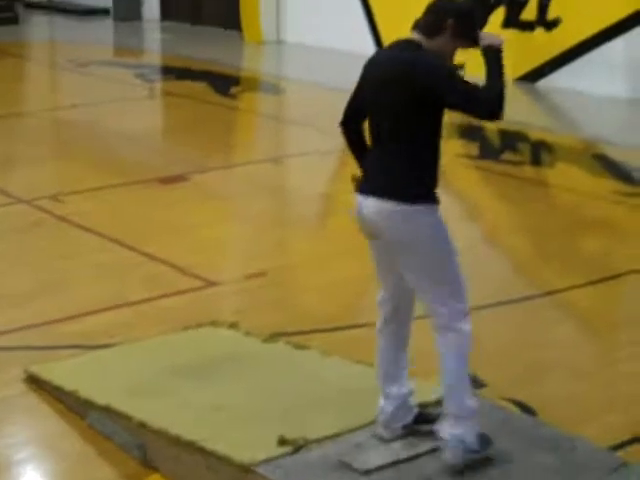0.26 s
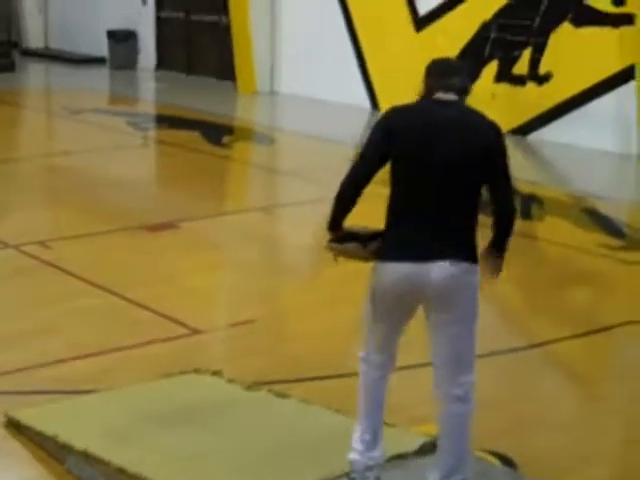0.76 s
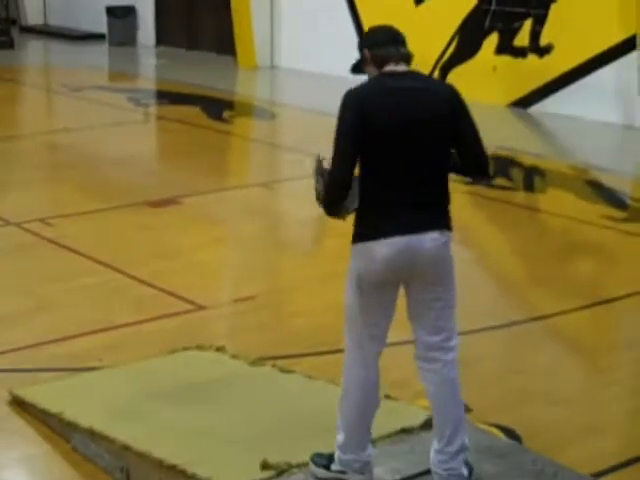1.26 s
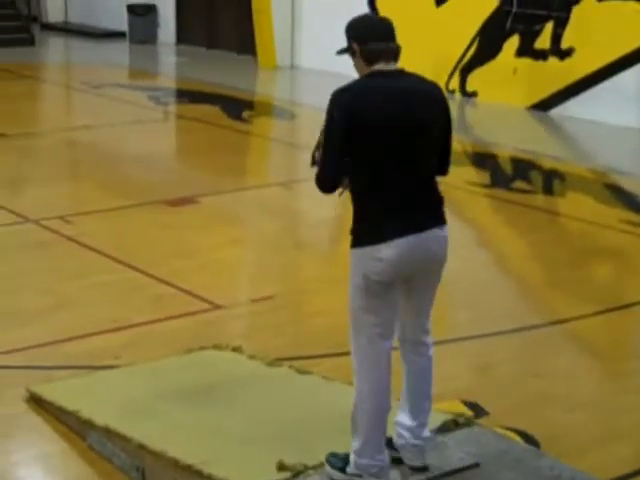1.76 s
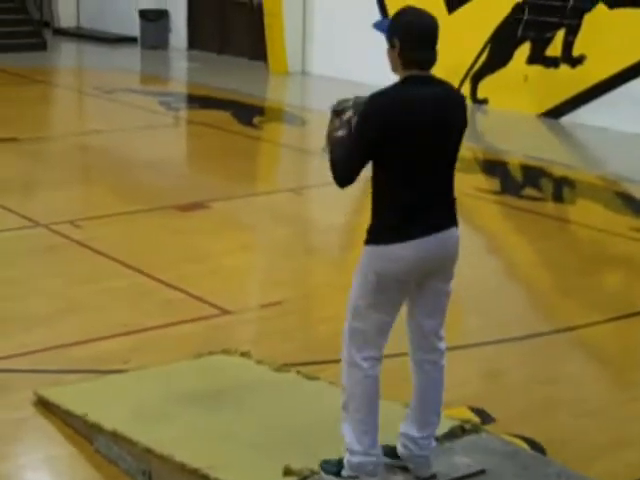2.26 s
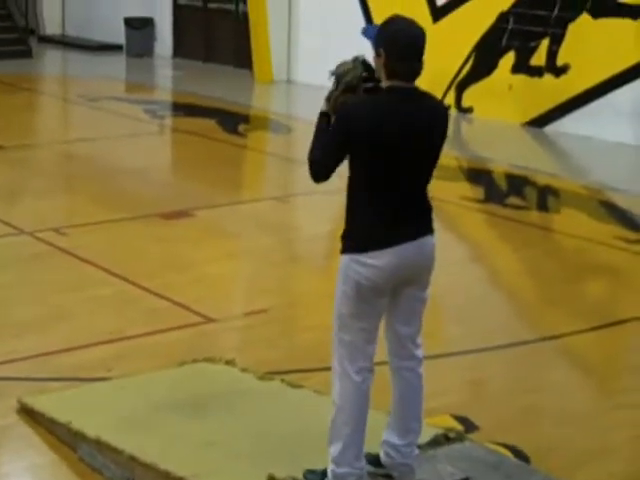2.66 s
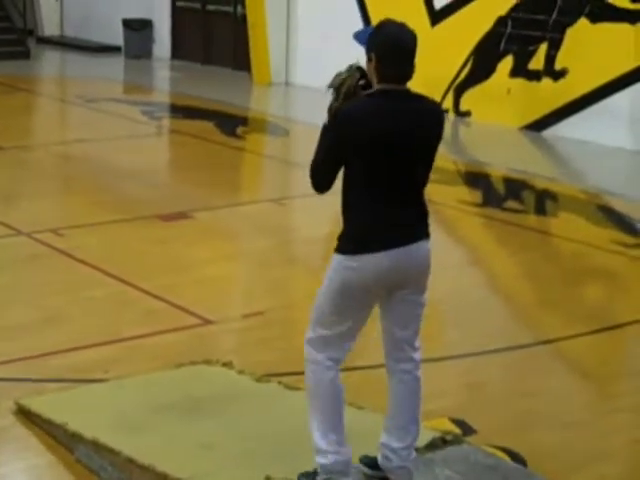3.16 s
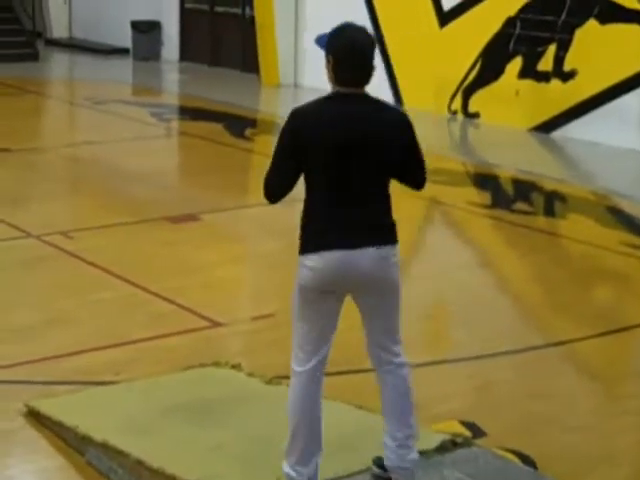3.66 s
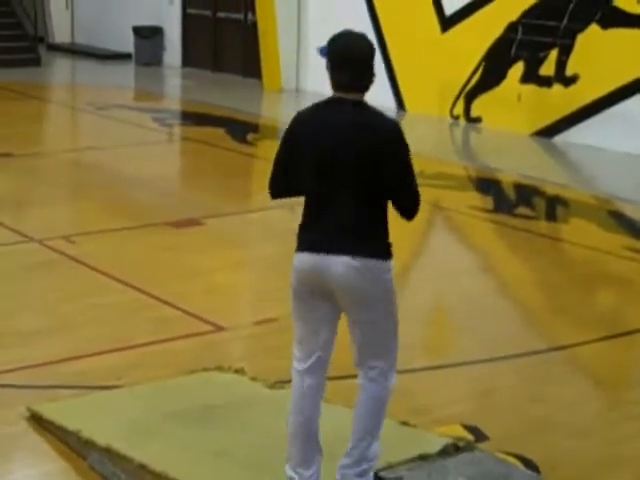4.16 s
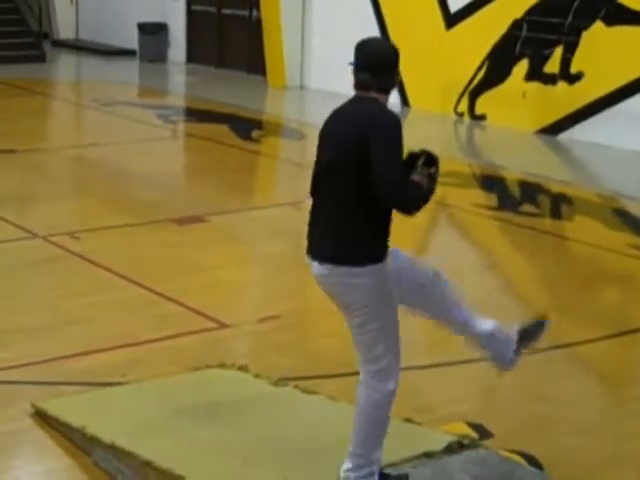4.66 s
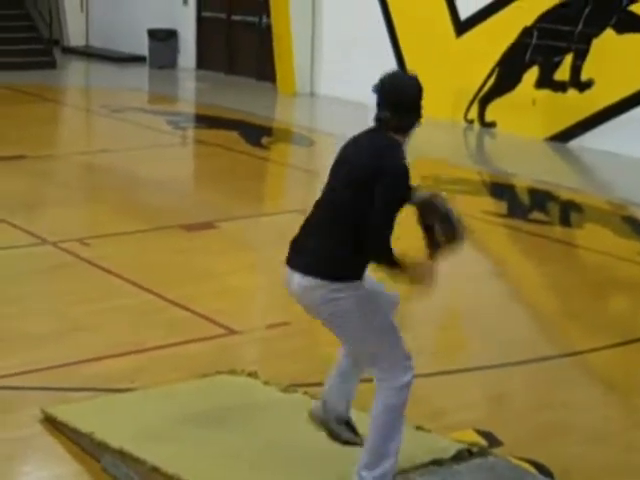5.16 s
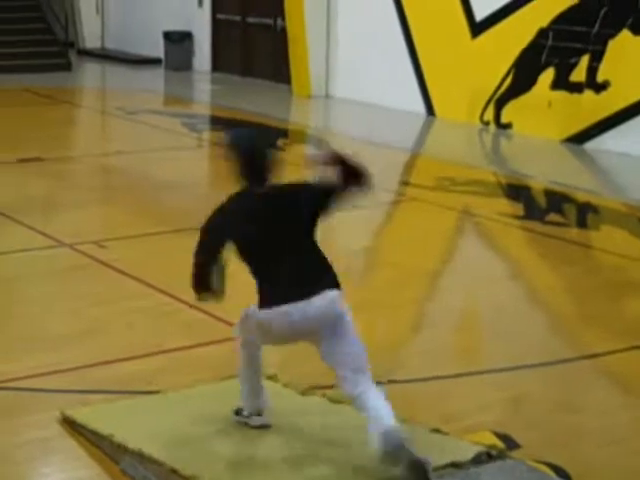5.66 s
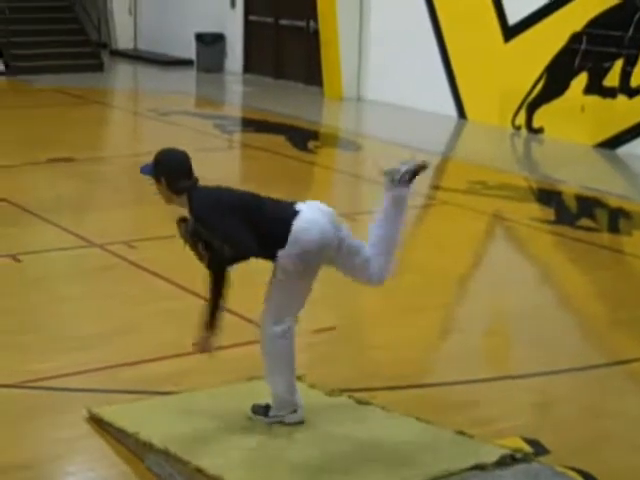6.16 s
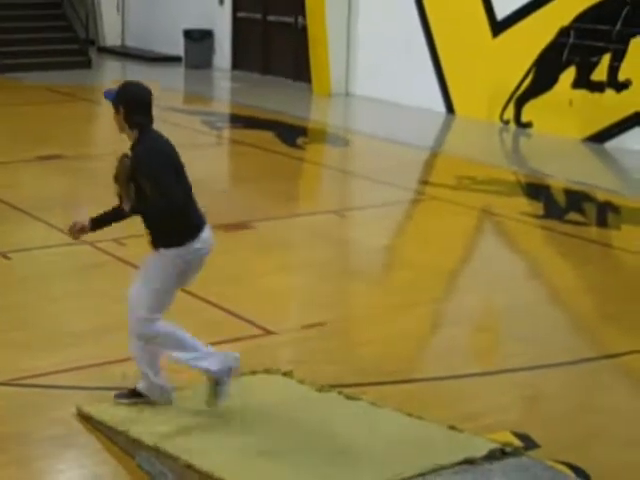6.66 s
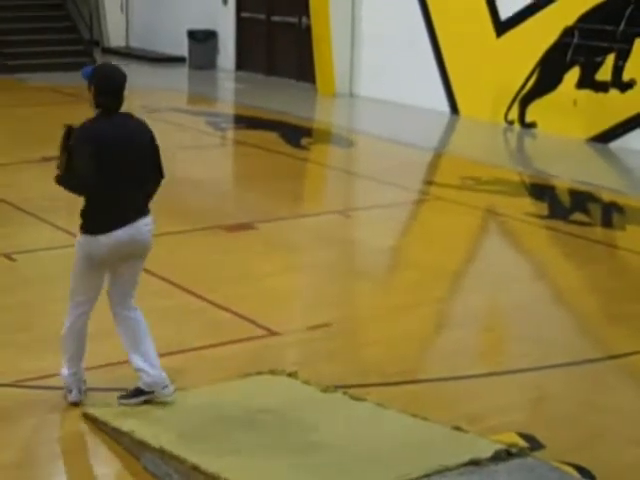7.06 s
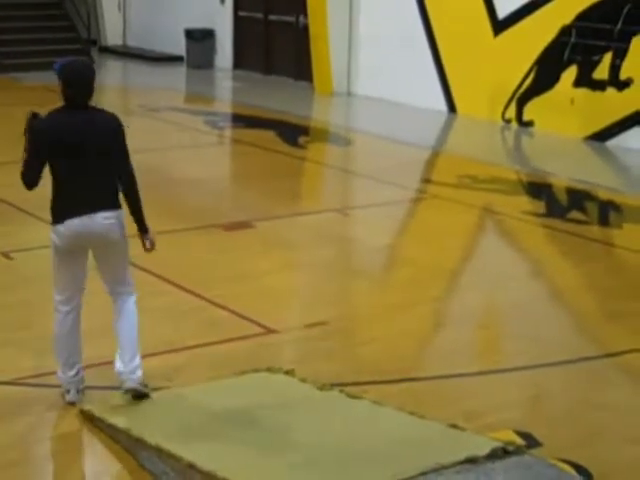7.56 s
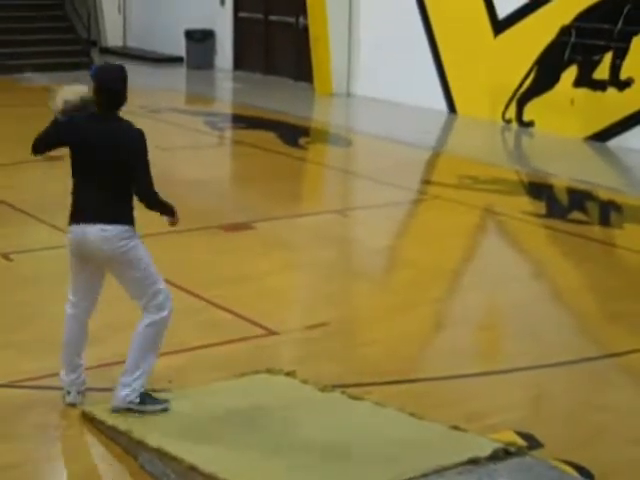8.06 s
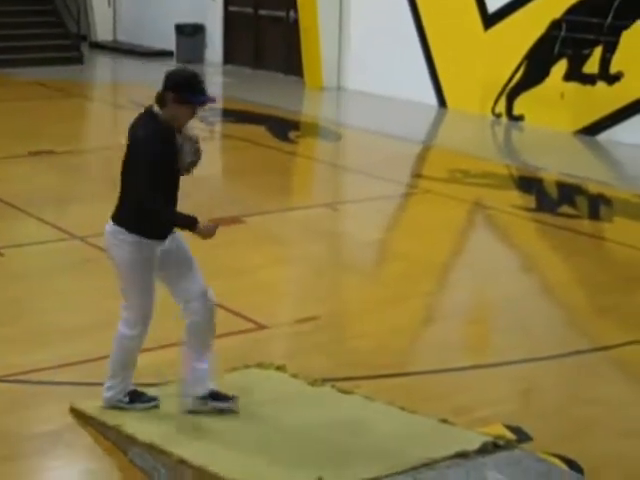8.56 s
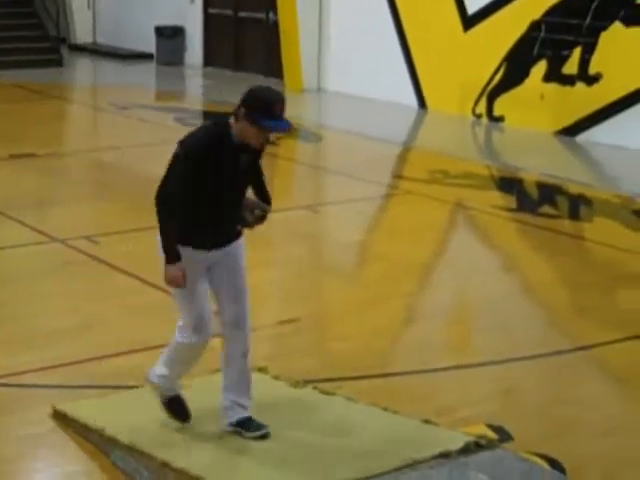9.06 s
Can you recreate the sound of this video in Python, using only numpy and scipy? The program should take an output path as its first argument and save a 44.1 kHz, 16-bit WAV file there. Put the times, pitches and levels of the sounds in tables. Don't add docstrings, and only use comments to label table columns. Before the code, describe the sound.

Fading echo of an earlier blow opens over electrical hum and airy room hush. Feet scuff and tick lightly on boxy boards; a multi-part landing thud booms, with a brief carpet scrape. A hard leather crack with a deep pocket boom fills the big hall, briefly ducking the sound captured by a small camera microphone. Footfalls, a modest glove slap and leather rustles follow.

```python
import sys
import numpy as np
from scipy import signal
from scipy.io import wavfile
from scipy.ndimage import uniform_filter1d

SR = 44100
rng = np.random.default_rng(int(sys.argv[2]) if len(sys.argv) > 2 else 0)


def level_to_linear(level):
    exponent = np.asarray(level, float) / 20
    return 10 ** exponent


def store_wav(level_fs):
    pcm = np.round(np.clip(np.atleast_2d(level_fs), -1, 1) * 32767)
    wavfile.write(sys.argv[1], SR, pcm.T.astype(np.int16))


N = 410571


def rms_one(x):
    return x / np.sqrt(np.mean(x ** 2) + 1e-20)


def at_hz(points, hz):
    points_hz, values = np.transpose(points)
    return np.interp(np.log(hz), np.log(points_hz), values)


def in_time(rows):
    return np.interp(np.arange(N) / SR, *np.transpose(rows))


def drift(rate_hz, count):
    r = np.exp(-128 * np.pi * rate_hz / SR)
    noise = rng.standard_normal((count, N // 64 + 2002))
    slow = signal.lfilter([1], [1, -2 * r, r * r], noise)[:, 2000:]
    return np.repeat(slow / slow.std(), 64, axis=1)[:, :N]


def low_pass(x, hz, order=2):
    return signal.sosfilt(signal.butter(order, hz, fs=SR, output="sos"), x)


def resonance(x, hz, width_hz):
    r = np.exp(-np.pi * max(width_hz, 5) / SR)
    zeros = np.array([1, 0, -1]) * (1 - r * r) / 2
    poles = [1, -2 * r * np.cos(2 * np.pi * hz / SR), r * r]
    return signal.lfilter(zeros, poles, x + 1e-18)


def twice(x, hz, width_hz):
    return resonance(resonance(x, hz, width_hz), hz, width_hz)


def body(x, modes):
    return sum((-1) ** k * level_to_linear(db) * resonance(x, hz, width_hz) for k, (hz, width_hz, db) in enumerate(modes))


def contact(seconds, rough):
    t = np.arange(2000) / SR / np.clip(seconds, .0003, .03)
    push = (1 - rough) * (1 - t / 2)
    rattle = rough * rng.standard_normal(len(t))
    return np.e * t * np.exp(-t) * (push + rattle)


def add(track, s, piece):
    i = max(round(s * SR), 0)
    track[i:i + len(piece)] += piece[:N - i]


def catch(hits, crack, pocket, crack_send_db, pocket_send_db):
    snap_db = 17
    sharp, deep, click = np.zeros(N), np.zeros(N), np.zeros(N)
    for s, crack_db, pocket_db, seconds in hits:
        add(sharp, s, level_to_linear(crack_db + 2.0) * contact(seconds * 0.65, rough=0.9))
        add(sharp, s, level_to_linear(crack_db + snap_db) * np.ones(1))
        add(deep, s, level_to_linear(pocket_db + 7) * contact(seconds * 0.29, rough=0.27))
    click[round(hits[1][0] * SR)] = 1
    send = level_to_linear(crack_send_db) * body(click, crack) + level_to_linear(pocket_send_db) * body(click, pocket)
    return body(sharp, crack) + body(deep, pocket), send


def far_mitt():
    # [t/s, crack/dB, pocket/dB, contact/s]
    mitt_hits = [
        (6.4495, -5.5, -4, 0.0029),
        (6.4521, 11, 10, 0.00073),
        (6.463, -12, 10, 0.0044),
        (6.4738, -0.5, -14, 0.0013),
        (6.4762, -2.5, 10, 0.0015),
        (6.483, -11, 7.5, 0.0029),
    ]
    # [f/Hz, width/Hz, level/dB]
    mitt_crack = [(2210, 770, -0.5), (5040, 880, -13.5), (6050, 1000, -13), (9400, 5600, -23.5),
                  (14000, 970, -15)]
    # [f/Hz, width/Hz, level/dB]
    mitt_pocket = [(133, 65, -14.5), (308, 61, -1.5), (562, 184, 1), (675, 152, 3.5)]
    return catch(mitt_hits, mitt_crack, mitt_pocket, crack_send_db=35.5, pocket_send_db=53.5)


def near_glove():
    # [t/s, crack/dB, pocket/dB, contact/s]
    glove_hits = [
        (8.2797, -16, -11, 0.0024),
        (8.2823, -4.5, -9, 0.0014),
        (8.2853, -9, -4, 0.0012),
        (8.2945, -25, -10, 0.00083),
        (8.328, -18, -21, .003),
        (8.355, -27, -24, 0.0036),
        (8.389, -18, -22, 0.0022),
    ]
    # [f/Hz, width/Hz, level/dB]
    glove_crack = [(1550, 1100, 1), (3700, 5200, -6), (5800, 550, -0.5), (8000, 690, -8.5),
                   (13200, 2200, -13)]
    # [f/Hz, width/Hz, level/dB]
    glove_pocket = [(330, 514, -5.5), (444, 51, 6), (756, 137, 4)]
    return catch(glove_hits, glove_crack, glove_pocket, crack_send_db=13.5, pocket_send_db=37.0)


def footfalls():
    # [t/s, peak/dB, hardness/dB]
    shuffles = [(0.502, -27, -26), (0.582, -41.5, -3), (0.656, -36, -42), (1.17, -44, 2.5),
                (1.192, -33.5, -13.5), (1.315, -34, -12), (1.966, -38.5, -8.5), (2.219, -48.5, 0),
                (2.497, -35.5, -10.5), (3.696, -45, -11), (4.018, -36.5, -15), (4.074, -39.5, -7),
                (4.255, -34, -43), (5.668, -39.5, -10), (8.389, -25, -9), (8.418, -29.5, -8),
                (8.894, -43, -15), (8.979, -40, -0.5)]
    # [t/s, peak/dB, hardness/dB]
    stride = [
        (5.774, -21.5, -16.5),
        (5.793, -21.5, -13),
        (5.812, -18.5, -21),
        (5.881, -19, -4),
        (5.888, -18, -6.5),
    ]
    # [t/s, peak/dB, hardness/dB]
    recovery = [
        (6.761, -17.5, -8),
        (6.777, -14, -22.5),
        (6.819, -22.5, -22),
        (6.887, -26, -22),
        (7.356, -27, -3.5),
        (7.42, -30, -9.5),
    ]
    gaps_s = .045 * 1.37 ** np.arange(5)
    rocks = [(stride[-1][0] + s, -22.5 - 4 * k, -14) for k, s in enumerate(np.cumsum(gaps_s))]
    # (contact/s, weight/dB)
    kinds = (shuffles, (0.01, -18.5)), (stride, (.009, -10)), (rocks, (.009, -11)), (recovery, (0.0096, -25))
    return [(*row, *feel) for rows, feel in kinds for row in rows]


def steps():
    # [f/Hz, width/Hz, level/dB]
    deck = [(117, 47, 1.5), (196, 63, 1), (278, 114, -5)]
    # [f/Hz, width/Hz, level/dB]
    box = [(40, 28, -13.5), (60.8, 7, 8)]
    # [f/Hz, width/Hz, level/dB]
    sole = [(368, 22, 10), (556, 254, 7), (760, 244, 9), (1720, 2500, -9.5)]
    push, slap, weight = np.zeros(N), np.zeros(N), np.zeros(N)
    for s, db, hard_db, seconds, weight_db in footfalls():
        force = contact(seconds * 0.21, rough=0.17) + 2.57 * contact(seconds, rough=0.85)
        add(push, s, level_to_linear(db + 10.0) * force)
        add(weight, s, level_to_linear(db + weight_db + 22.5) * force)
        add(slap, s, level_to_linear(db + hard_db + 13.5) * contact(seconds * 0.54, rough=0.93))
    thud = low_pass(body(push, deck), 550) + low_pass(body(weight, box), 204)
    return thud, low_pass(body(slap, sole), 1920)


def ticks():
    # [t/s, peak/dB, f/Hz]
    dull_ticks = [(.05, -35.5, 1390), (0.248, -37.5, 3130), (0.348, -28, 1500), (2.218, -43, 1500),
                  (4.075, -32, 2120), (4.547, -38, 3250), (4.558, -36, 2340), (4.572, -41, 2900),
                  (4.585, -37, 2240), (5.054, -33, 1500), (5.682, -29.5, 1660), (5.846, -28.5, 2150),
                  (7.208, -28.5, 1500), (7.417, -31, 2330), (7.447, -41, 3460), (8.98, -37, 1800)]
    # [t/s, peak/dB, f/Hz]
    bright_ticks = [(.581, -33, 2070), (5.801, -35.5, 3740), (6.151, -40, 2950), (6.888, -34, 3000),
                    (7.08, -42, 3000), (7.356, -32.5, 3820), (8.89, -40, 2480), (9.136, -39.5, 2980)]
    out = np.zeros(N)
    # (contact/s, treble/dB)
    kinds = (dull_ticks, (0.0028, -14)), (bright_ticks, (0.003, 17.6))
    for s, db, hz, seconds, treble_db in [(*row, *feel) for rows, feel in kinds for row in rows]:
        ring, broad, treble = (contact(seconds, rough=0.6) for part in range(3))
        click = 2.0 * twice(ring, hz, 840) + 1.1 * twice(broad, 1740, 2300)
        add(out, s, level_to_linear(db) * (click + level_to_linear(treble_db - 14.5) * twice(treble, 5700, 7300)))
    return out


def scuff():
    # [peak t/s, level/dB, swell/s, fade/s]
    drags = [
        (5.81, -44, .02, .04),
        (5.96, -41.5, 0.2, 0.061),
    ]
    edge_db = 16
    t = np.arange(N) / SR
    level = np.zeros(N)
    for s, db, swell_s, fade_s in drags:
        edge = np.where(t < s, (s - t) / swell_s, ((t - s) / fade_s) ** 2)
        level += level_to_linear(db - edge_db * edge)
    grains = rng.standard_normal(N) * level_to_linear(3.7 * drift(60, count=1)[0])
    pile = resonance(grains, 6700, 5100) + 0.62 * resonance(grains, 12700, 3100)
    return level * level_to_linear(-2) * rms_one(pile)


def diffuse(size, gain_of_band):
    # [f/Hz, left-right likeness]
    likeness = [(60, 0.9), (180, 0.96), (540, 0.96), (1610, 0.58), (4840, 0.21), (14500, 1)]
    out, edges_hz = 0, 25 * 2 ** (np.arange(29) / 3)
    white = rng.standard_normal((2, 2, size))
    for k, (low, high) in enumerate(zip(edges_hz, edges_hz[1:])):
        band = signal.butter(2, [low, high], "band", fs=SR, output="sos")
        mid, side = signal.sosfilt(band, white[k % 2])
        hz = np.sqrt(low * high)
        alike = np.clip(at_hz(likeness, hz), -.99, .99)
        stereo = np.sqrt(1 + alike) * mid + np.sqrt(1 - alike) * side * [[1], [-1]]
        out = out + gain_of_band(hz) * stereo
    return out


def hall(sends):
    # [f/Hz, T60/s]
    hall_t60 = [(50, 4.1), (120, 2.77), (250, 2.99), (700, 1.81), (2000, 1.96), (5000, 1.55), (9000, 0.93),
                (14000, 0.23)]
    # [f/Hz, level/dB]
    hall_colour = [(50, 1), (300, -0.5), (700, -5), (1200, -2.5), (2200, 2), (6000, 3.5), (14000, 3)]
    far_wall = {"mitt": (.22, .07, .75), "glove": (.08, .05, .5), "feet": (.08, .05, .3)}
    # [f/Hz, width/Hz, level/dB]
    earlier_blow = [(70, 88, 27.5), (137, 88, 32.5), (535, 270, 27), (1500, 2100, 9.5), (6000, 9600, 3.5)]
    t = np.arange(round(2.6 * SR)) / SR
    tail = diffuse(len(t), lambda hz: level_to_linear(at_hz(hall_colour, hz) - 60 * t / at_hz(hall_t60, hz)))
    clumps_db = 2.0 * np.exp(-t / .15) * drift(160, count=1)[0, :len(t)]
    tail *= level_to_linear(clumps_db) * (1 - np.exp(-t / .016)) / np.sqrt(SR)
    out = np.zeros((2, N))
    for name, x in sends.items():
        delay_s, spread_s, gain = far_wall[name]
        swell = 1 + gain * np.exp(-.5 * ((t - delay_s) / spread_s) ** 2)
        out += signal.fftconvolve(x[None], tail * swell, axes=1)[:, :N]
    skip = SR // 10
    late = body(tail, earlier_blow)[:, skip:] * np.exp(-t[:-skip] / 1.2)
    out[:, :late.shape[1]] += late
    return out


def buzz():
    # [multiple of buzz rate, left/dB, right/dB]
    hum = [(2, -60, -60), (3, -68, -65), (4, -68, -63), (5, -60, -67), (6, -62, -65), (7, -65, -67),
           (9, -62, -63), (10, -64, -77), (12, -64, -65), (17, -61, -60), (28, -68, -71), (33, -68, -67),
           (34, -67, -68)]
    # [multiple of buzz rate, louder ear/dB]
    whine_partials = [(36, -66), (39, -57), (42, -62), (43, -62), (44, -66), (45, -53), (46, -58),
                      (47, -54), (48, -47), (49, -61), (50, -47), (51, -52), (52, -46), (53, -49),
                      (54, -61), (55, -50), (56, -40), (57, -51), (58, -59), (59, -62), (60, -65),
                      (61, -64), (62, -61), (64, -62), (65, -63), (67, -57), (68, -64), (69, -60),
                      (72, -65)]
    # [t/s, level/dB]
    whine = [(0.0, -51), (0.5, -44.5), (3.1, -46.5), (4.75, -44), (6.3, -46), (9.31, -44.5)]
    swing = {39: -7, 40: 9, 41: 15, 44: 10, 45: -8, 59: 9, 67: -6}
    buzz_hz, whine_multiple, swing_s = 119.99, 56, .4
    ear_swap_multiple = 57.5
    right_side, left_side = (8.5, -1.69), (7.6, 1.56)   # (quieter ear drop/dB, left lead/rad)

    levels_db = -75 + 3.5 * rng.standard_normal((80, 2))
    levels_db[72:] -= 9
    starts, leads = rng.uniform(-np.pi, np.pi, (2, 80))
    leads *= np.minimum(np.arange(80) / 30, 1)
    for multiple, left_db, right_db in hum:
        levels_db[multiple] = left_db, right_db
    for multiple, db in whine_partials:
        right = multiple < ear_swap_multiple
        drop_db, leads[multiple] = right_side if right else left_side
        levels_db[multiple] = db - drop_db * right, db - drop_db * (not right)

    t = np.arange(N) / SR
    wander_db = drift(.5, count=20)
    swinging = np.exp(-(t / swing_s) ** 2)
    step = np.exp(2j * np.pi * buzz_hz * t)
    turn, out = step.copy(), np.zeros((2, N))
    for k in range(2, 80):
        turn = turn * step
        phases = starts[k] + np.array([leads[k], 0])
        weight = np.sqrt(2) * level_to_linear(levels_db[k]) * np.exp(1j * phases)
        change_db = in_time(whine) + 45 if k == whine_multiple else wander_db[k % 20] * k * .035
        out += (weight[:, None] * turn).real * level_to_linear(change_db + swing.get(k, 0) * swinging)
    return out


def air():
    # [f/Hz, density/(dB per Hz)]
    air_spectrum = [(30, -2.5), (60, 5), (130, 1), (250, -4), (600, -10.5), (1200, -17), (2100, -13.5),
                    (3100, -21.5), (4100, -17), (5000, -23), (6500, -16), (8500, -18), (10500, -36),
                    (14500, -21)]
    # [t/s, level/dB]
    air_level = [(0.0, -51), (9.31, -50.5)]
    lumps_db = drift(0.6, count=1)[0]
    hush = diffuse(N, lambda hz: level_to_linear(at_hz(air_spectrum, hz) + lumps_db * 60 / (hz + 30)))
    return level_to_linear(in_time(air_level)) * rms_one(hush)


def preamp_hiss():
    level = level_to_linear(-64.5 + 3.7 * drift(6, count=2))
    return level * resonance(rng.standard_normal((2, N)), 14000, 4000)


def ports(x):
    # [f/Hz, width/Hz, gain]
    cavities = [
        [(8780, 630, 2.6), (13300, 6800, 4.3)],
        [(6000, 2520, 2.05), (3960, 1000, 0.54)],
    ]
    ears = []
    for ear, cavity, cut_hz in zip(x, cavities, (8540, 7700)):
        lifted = ear + sum(gain * resonance(ear, hz, width_hz) for hz, width_hz, gain in cavity)
        ears.append(low_pass(lifted, cut_hz, order=4))
    leak = 0.23 * resonance(x, 13700, 2500) * [[1], [.15]]
    out = np.array(ears) + leak
    out[0] += (level_to_linear(-4) - 1) * low_pass(out[0], 68.6, order=1)
    return out


def scene():
    mitt, mitt_send = far_mitt()
    glove, glove_send = near_glove()
    thud, slap = steps()
    small = ticks() + scuff()
    feet_send = level_to_linear(.7) * thud + level_to_linear(7.0) * slap + level_to_linear(3.0) * small
    wet = hall({"mitt": mitt_send, "glove": glove_send, "feet": feet_send})
    feet = (thud + slap) * level_to_linear(np.array([[-.6], [.6]]))
    direct = mitt + glove + feet + small
    return ports(direct + wet + air()) + buzz() + preamp_hiss()


def band_limit(x):
    return signal.sosfilt(signal.butter(12, 15100, fs=SR, output="sos"), x)


def record(dry):
    limit_db, attack_s, recover_db_s, cutoff_hz = -12, 0.053, 32, 15500
    level_db = 10 * np.log10(uniform_filter1d(np.mean(dry ** 2, axis=0), 200) + 1e-12)
    slope_db = recover_db_s * np.arange(N) / SR
    held_db = np.maximum(np.maximum.accumulate(level_db - limit_db + slope_db) - slope_db, 0)
    r = np.exp(-1 / (attack_s * SR))
    duck_db = signal.lfilter([1 - r], [1, -r], held_db)
    x = np.clip(dry * level_to_linear(-duck_db), -1.0, 1.0)
    x = signal.sosfilt(signal.cheby2(10, 60, cutoff_hz, fs=SR, output="sos"), x)
    return band_limit(x)


dry = scene()
out = record(dry)
store_wav(out)
```